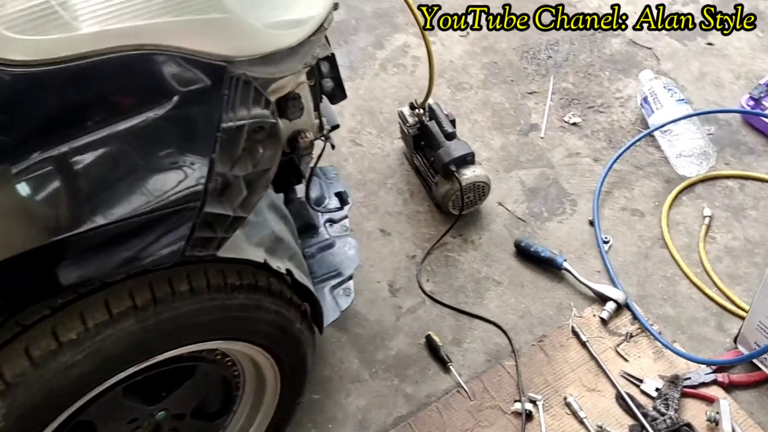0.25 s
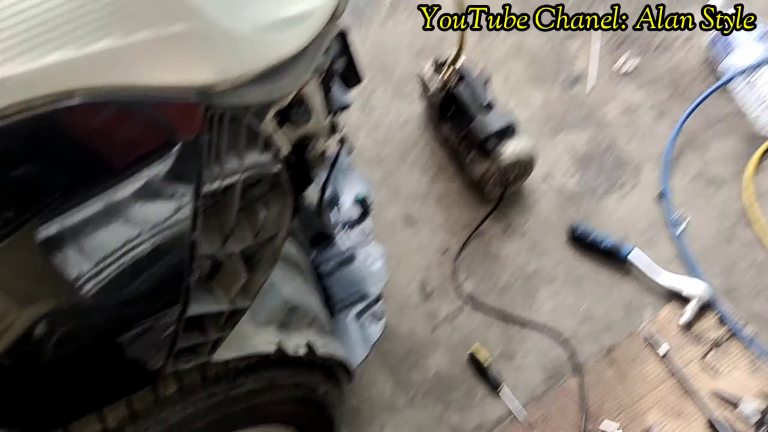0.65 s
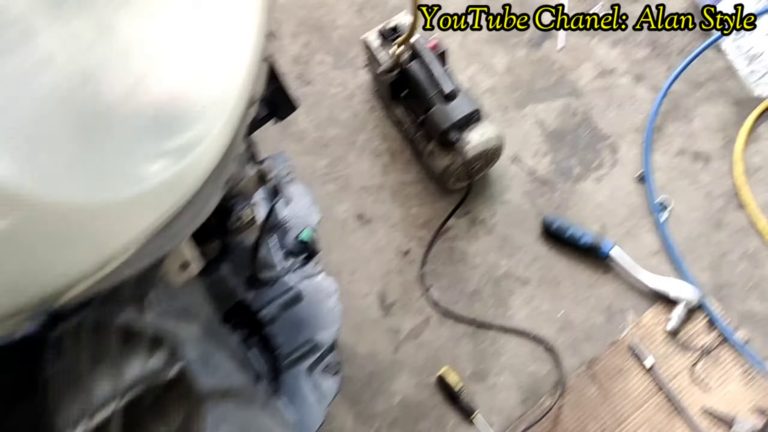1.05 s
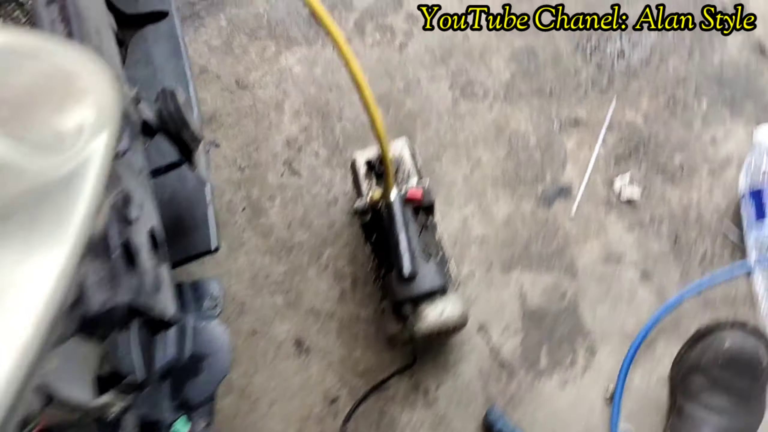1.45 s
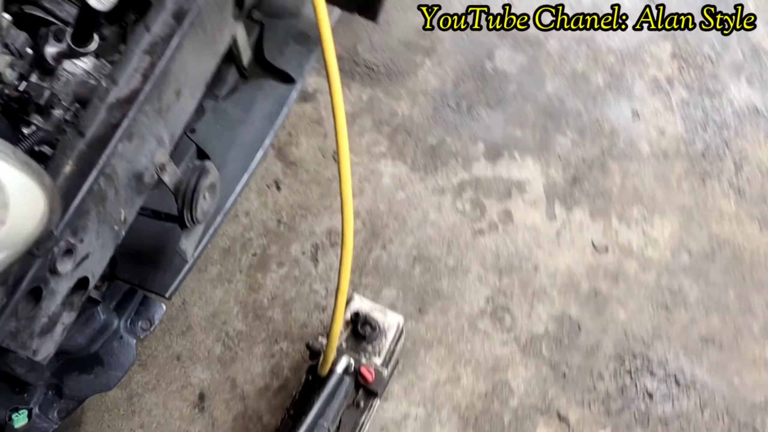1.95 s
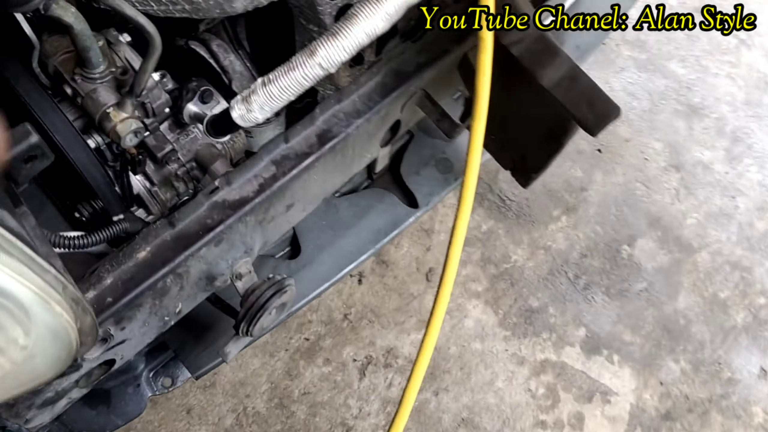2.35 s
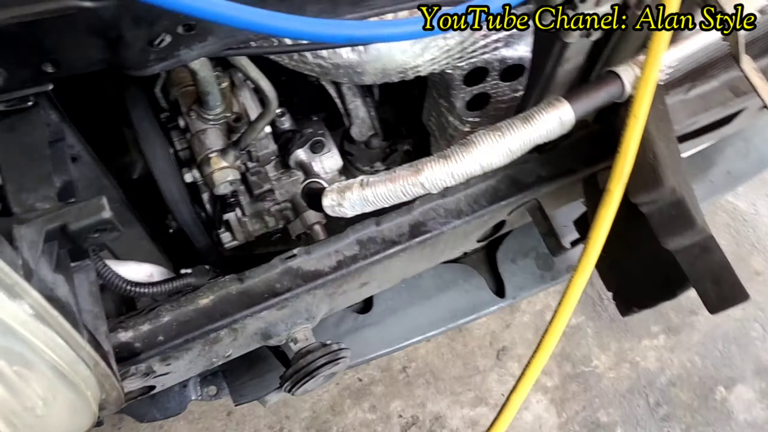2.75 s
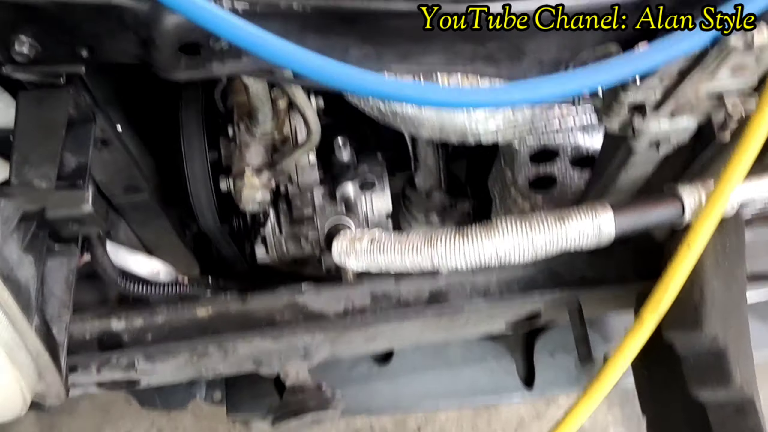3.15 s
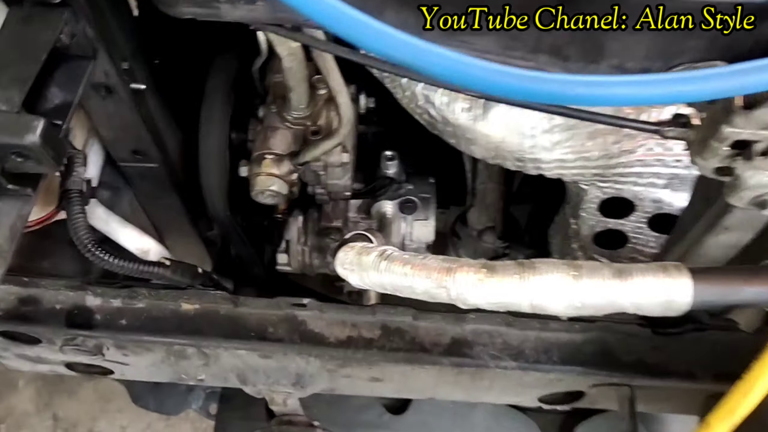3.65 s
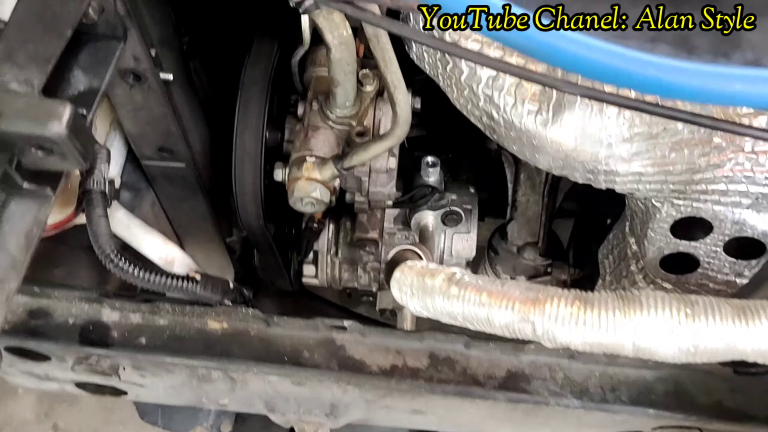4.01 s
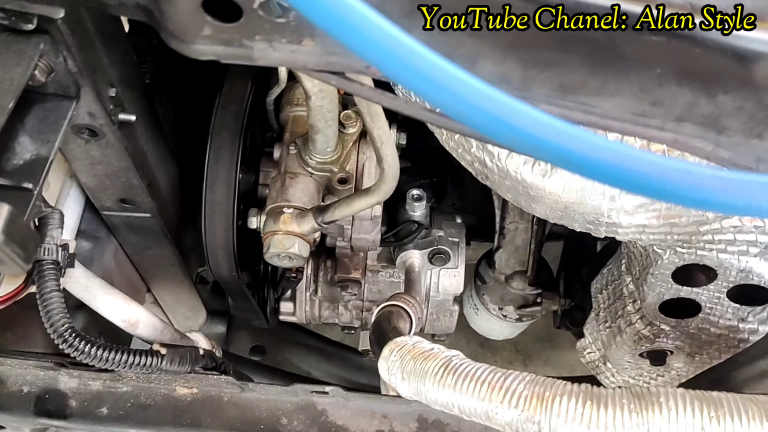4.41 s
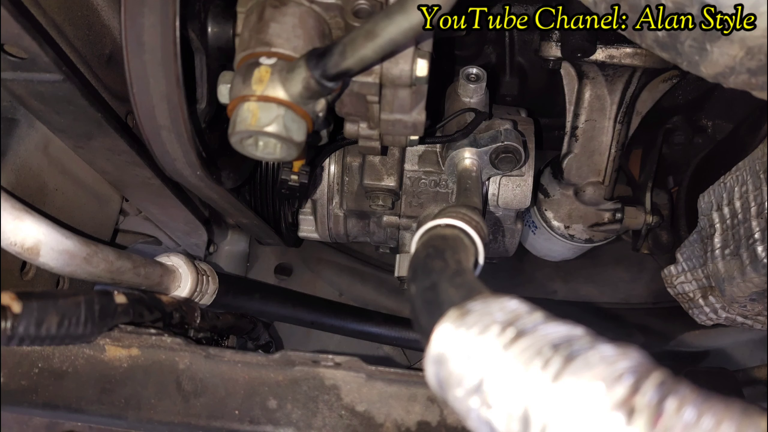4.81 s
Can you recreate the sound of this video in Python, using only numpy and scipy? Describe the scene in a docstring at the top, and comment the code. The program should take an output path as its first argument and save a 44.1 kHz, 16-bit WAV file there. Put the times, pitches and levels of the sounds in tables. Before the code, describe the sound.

Steady fast metallic rattling of a vane pump, with hiss, whirr and low motor hum, interrupted by small microphone bumps and a brief finger rub.

```python
"""An electric rotary-vane vacuum pump runs from the start while a hand-held microphone moves past it.
On every shaft turn two vanes slap and bounce, ringing the metal casing along with air hiss and a whirr;
the motor hums, and a low workshop background holds faint tones at the start and again after 2 s.
Short decaying swings make knocks on the microphone from 0.76 s; near 3.7 s they crowd together and a
rumble of filtered noise is a finger sliding. A short fade ends the sound at 4.84 s, then silence."""
import sys
import numpy as np
from scipy import signal
from scipy.fft import rfft, irfft, next_fast_len
from scipy.io import wavfile
from scipy.ndimage import uniform_filter1d

SR = 44100
rng = np.random.default_rng(int(sys.argv[2]) if len(sys.argv) > 2 else 0)


def to_wav(s):
    """Save 16-bit WAV."""
    ch = np.atleast_2d(s).T  # columns
    pcm = np.round(np.clip(ch, -1, 1) * 32767)  # PCM
    wavfile.write(sys.argv[1], SR, pcm.astype(np.int16))


N = 223799

SHAFT_HZ, FIRST_SLAP_S = 47.155, .0027  # shaft turns per second, time of the first slap


def gain_of(db):
    """Turns decibels into a gain."""
    return 10 ** (np.asarray(db) / 20)


def evened(x):
    """Scales a sound to rms 1."""
    return x / np.sqrt(np.mean(x ** 2) + 1e-20)


def levelled(x, span_s=0.35):
    """Evens out loudness along a sliding span, to about rms 1."""
    size = int(span_s * SR)
    power = uniform_filter1d(uniform_filter1d(x ** 2, size), size)
    return x / np.sqrt(abs(power) + 1e-20)


def curves(rows):
    """Joins the points of a time table with straight lines: one curve for each column after the time."""
    s, *columns = np.transpose(rows)
    return np.array([np.interp(np.arange(N) / SR, s, column) for column in columns])


def colour(x, points):
    """Filters by a spectrum given as points in dB, joined over log frequency."""
    points_hz, points_db = np.transpose(points)
    size = next_fast_len(x.shape[-1])
    hz = np.fft.rfftfreq(size, 1 / SR)
    filter_db = np.interp(np.log(hz + 1), np.log(points_hz + 1), points_db)
    return irfft(rfft(x, size) * gain_of(filter_db), size)[..., :x.shape[-1]]


def sides(balance_db):
    """Left and right gains for a balance in dB; above 0 the left is louder."""
    pair = gain_of([balance_db / 2, -balance_db / 2])
    return pair / pair.mean(0)


def pair_noise(same, size=N):
    """Two channels of white noise: unrelated when same is 0, identical when it is 1."""
    a, b = rng.standard_normal((2, size))
    same = np.clip(same, 0, 1)
    return np.array([a, same * a + np.sqrt(1 - same ** 2) * b])


def wander(span_s):
    """A slow random drift of rms 1, made by smoothing noise twice."""
    size = max(int(span_s * SR), 2)
    return evened(uniform_filter1d(uniform_filter1d(rng.standard_normal(N), size), size))


def vanes(bounce_db=1.0, slip_ms=.06):
    """Clicks where two opposite vanes strike the wall and bounce, each time a little differently."""
    # a slap and its bounces: after_ms, level_db (only their relative size counts)
    bounces = [(0, 1), (1.7, -1), (4.7, -7), (8.3, -10), (11, -16.5)]
    # the opposite vane, half a turn later, settles: start_s, level_db against the first vane
    second_vane = [(0, -2), (.5, -0.5), (.9, -2), (1.3, -6), (2, -13.5), (4.9, -22)]
    # turns given a set slap strength, weak, ordinary or strong: time_s, level_db
    set_slaps = [(0.045, 1.5), (0.066, -2.5), (0.088, -1.5), (0.257, -5.5), (0.3, -5), (0.342, 1),
                 (0.406, -9), (0.427, -11.5), (0.512, -6.5), (0.533, -3), (0.575, 3), (0.724, 4),
                 (0.745, -2.5), (0.787, 4.5), (0.872, 3), (0.915, 2), (0.936, 1.5), (0.957, -6.5),
                 (0.978, -1), (0.999, -6), (1.084, 0.5), (1.105, 0.5), (1.148, 1.5), (1.169, -5.5),
                 (1.19, 3.5), (1.211, 3.5), (1.254, -7), (1.296, -7.5), (1.318, -8.5), (1.424, 3.5),
                 (1.445, 2), (1.466, 2), (1.53, -3), (1.551, 4), (1.593, -2.5), (1.636, -8), (1.657, -5.5),
                 (1.678, 1), (1.699, 3), (1.72, -2), (1.742, 3), (1.805, -1.5), (1.826, -6), (1.848, 2.0),
                 (1.933, -7), (1.954, -2.5), (1.975, -5), (2.017, 1.5), (2.039, 1), (2.06, -1.5),
                 (2.081, 1), (2.102, -9.5), (2.123, 1), (2.251, -5), (2.272, 0.5), (2.293, 2.5),
                 (2.399, -3.5), (2.42, -7), (2.484, -4), (2.505, -10), (2.526, 2), (2.547, -7.5),
                 (2.569, 1), (2.611, 3.5), (2.675, 3), (2.696, -4), (2.717, -5), (2.738, 3), (2.781, 0.5),
                 (2.823, 1.5), (2.844, 1), (2.866, -6.5), (2.887, -6), (2.908, 1.5), (2.929, -7),
                 (2.993, -6.5), (3.014, -7), (3.099, -5.5), (3.12, 1.5), (3.247, -7), (3.311, -2),
                 (3.417, -8.5), (3.459, -5), (3.481, -4), (3.544, -14.5), (3.587, 4), (3.608, 5.5),
                 (3.671, -2.5), (3.714, 2), (3.735, 4.5), (3.905, -3.5), (3.926, 2.5), (3.968, -1),
                 (4.011, -5), (4.117, -6.5), (4.138, -4), (4.159, -0.5), (4.181, 2.5), (4.223, 3),
                 (4.329, 0), (4.371, 3), (4.435, -10.5), (4.477, -2.5), (4.499, 1), (4.52, -2.5),
                 (4.563, -3), (4.584, 2), (4.732, -0.5), (4.753, -5), (4.774, 0.5), (4.795, -1),
                 (4.817, -12)]
    spread_db, port_slip_ms = 1.0, .014  # strength of all other slaps; arrival time at each port

    turns = np.arange(int(N / SR * SHAFT_HZ) - 1)
    strength_db = spread_db * rng.standard_normal(len(turns))
    set_s, set_db = np.transpose(set_slaps)
    set_turns = np.round((set_s - FIRST_SLAP_S) * SHAFT_HZ).astype(int)
    strength_db[set_turns] = set_db

    after_ms, fall_db = np.transpose(bounces)
    second_db = np.interp(turns / SHAFT_HZ, *np.transpose(second_vane))
    clicks, first = np.zeros((2, 2, N))
    for late_turns, vane_db in ((0, 0.012), (.5, second_db)):
        slip, size = rng.standard_normal((2, len(turns), len(bounces)))
        slap_s = FIRST_SLAP_S + (turns[:, None] + late_turns) / SHAFT_HZ
        s = slap_s + (after_ms + slip_ms * slip) / 1000
        slap_gain = gain_of(strength_db + vane_db)
        blow = gain_of(fall_db + bounce_db * size)
        blow *= slap_gain[:, None] / np.linalg.norm(blow, axis=1)[:, None]  # bounces share one blow
        for port in clicks:  # each bounce lands elsewhere on the wall, so its path to each port differs
            port_s = s + port_slip_ms / 1000 * rng.standard_normal(s.shape)
            np.add.at(port, (port_s * SR).astype(int), blow)
        first[:, (s[:, 0] * SR).astype(int)] += slap_gain
    strength_curve_db = np.interp(np.arange(N) / SR * SHAFT_HZ, turns + 0.091, strength_db)
    return evened(clicks), first, strength_curve_db


def casing(broad_db=-3, broad_t60=0.079, unlike=1.144, rise_ms=0.91):
    """Ring of the metal casing: fading sines plus dense noise, with other phases at each microphone port."""
    # clear modes of the casing: pitch_hz, width_hz (wider fades faster), level_db (relative)
    modes_table = [(1228.6, 13, -6), (1410, 12, -5), (1637, 16, -4.5), (1950, 180, -28.5),
                   (2600, 180, -32.5), (3230, 23, -25.5), (2828, 45, -27), (3412, 30, -20), (3603, 16, -8),
                   (3745, 34, -9), (4000, 110, -20), (4519, 36, -11.5), (4815, 48, -11.5), (5730, 17, -17),
                   (5970, 20, -12.5), (5890, 32, -13), (6520, 24, -10), (7064, 30, -2.5), (6790, 170, -8),
                   (7900, 14, -21), (8030, 19, -11), (7930, 41, 2), (8750, 47, -11), (8770, 57, -9),
                   (8576, 37, -0.5), (8530, 190, 0), (8880, 58, 1.5), (10260, 57, -18.5), (9340, 98, -23),
                   (10084, 90, -7.5), (10640, 92, -10.5), (11540, 150, -7.5), (13800, 110, -16)]
    # the many small modes between them: pitch_hz, level_db_per_hz (relative)
    broad = [(900, -76), (1300, -37), (2200, -30.5), (3100, -33), (3700, -20), (4200, -45), (4600, -12.5),
             (6300, -18), (7000, -12), (8500, -14), (9600, -19), (12000, -19), (14000, -26), (16000, -22.5)]
    t = np.arange(8192) / SR
    hz, width, db = np.transpose(modes_table)[:, :, None]
    phase = rng.uniform(0, 2 * np.pi, hz.shape) + unlike * rng.standard_normal((2, *hz.shape))
    fading = gain_of(db) * width * np.exp(-np.pi * width * t)
    modes = (fading * np.sin(2 * np.pi * hz * t + phase)).sum(1)
    modes *= 1 - np.exp(-t * 1000 / rise_ms)
    dense = colour(pair_noise(0.028, size=len(t)) * gain_of(-60 * t / broad_t60), broad)
    return evened(modes) + gain_of(broad_db) * evened(dense)


def reflections(t60=0.23):
    """Floor, car body and walls: one fading noise tail, the same for both ports."""
    t = np.arange(SR // 3) / SR
    tail = pair_noise(1.0, size=len(t)) * gain_of(-60 * t / t60) * (t > .003)
    return tail / np.linalg.norm(tail[0])


def crack(rise_ms=0.61, t60=.03):
    """Short bright burst of noise that each click sets off."""
    # colour of the burst: pitch_hz, level_db_per_hz (relative)
    burst_colour = [(2500, -50), (3200, -38), (3700, -10), (4200, -33), (4600, -11.5), (6000, -10.5),
                    (7000, -4.5), (8600, -1.5), (9600, -8), (12000, -12.5), (16000, -19)]
    t = np.arange(8192) / SR
    burst = pair_noise(0.35, size=len(t)) * gain_of(-60 * t / t60)
    burst = burst * (1 - np.exp(-t * 1000 / rise_ms))
    return evened(colour(burst, burst_colour))


def rung(first, modes, slow_db, turn=1, port_rad=1.39, rise_ms=1.7):
    """Each vane's first blow rings a pair of modes; turn=-1 starts them opposed, and phases differ by port."""
    t = np.arange(SR // 4) / SR
    out = 0
    for k, ((hz, width, db), level_db) in enumerate(zip(modes, slow_db)):
        envelope = np.exp(-np.pi * width * t) * (1 - np.exp(-t * 1000 / rise_ms))
        ring = envelope * np.sin(2 * np.pi * hz * t + [[0], [port_rad]])
        sound = levelled(signal.oaconvolve(first, ring, axes=1)[:, :N])
        out = out + turn ** k * gain_of(db + level_db) * sound
    return out


def by_move(rows):
    """One curve per band: its mean plus its share of each motion of the microphone."""
    # the moving microphone: start_s, nearness_db, lean_to_left_db, top_treble_lift_db
    move = [(0, -2, 5, 0), (.4, -2.5, 3.5, 0.5), (.8, -1, 1, 1), (1.2, -1.5, -1, 3),
            (1.6, -0.76, -0.5, 0.5), (2.0, -0.5, -4, 2), (2.4, -1.1, -1.5, 1), (2.8, -1.53, -3, 0),
            (3.2, 1, -3.5, 1), (3.6, 2.5, 0, 1), (4.0, 2.5, 2.5, 1), (4.4, 2.5, 4.5, -6),
            (4.8, 2.5, 0.5, -2)]
    rows = np.array(rows)
    return rows[:, :1] + rows[:, 1:] @ curves(move)


def pump(hiss_db=-14, follow=0.79, wet_db=-12, spot_s=0.3021, count=8):
    """Clicks, air hiss and whirr ring the casing; the microphone's motion shifts each band separately."""
    # bearings and oil whirr whatever the vanes do: pitch_hz, level_db against the slaps
    whirr = [(900, -7), (2000, -5), (3000, 0), (3700, -5), (5000, -10), (6800, -9), (7600, -20),
             (9500, -16), (12000, -9), (16000, -7)]
    # crack at each blow, plainer when the microphone faces the pump: start_s, level_db before band levelling
    crack_db = [(0, -7.5), (1.2, -16.5), (2, -5.5), (3, -10), (3.8, -11.5), (4.2, 0.5), (4.8, -3)]
    # dips where casing modes cancel, and one small lift: pitch_hz, width_hz, level_db
    hollows = [(2200, 140, -1), (3540, 380, -9.5), (4182, 128, -14.5), (5360, 70, -7), (6730, 240, 2),
               (7400, 120, -5.5)]
    # where one frequency band meets the next: pitch_hz
    band_edges = [1000, 2200, 3150, 4250, 7300, 8150, 9700, 22000]
    # level of each band: mean_db, then db per db of nearness, lean and lift
    band_levels = [(-57.5, 2.33, 0.47, 0.44), (-63.5, 1.47, -0.51, -0.14), (-51, 0.23, 0.32, 0.28),
                   (-46.5, 1.86, -0.11, -0.66), (-47.5, 2.5, -0.61, -0.53), (-42, 0.61, -1.02, -0.04),
                   (-45.5, 1.98, -0.13, 1)]
    # left-right balance of each band: mean_db, then db per db of nearness, lean and lift
    band_balances = [(2.5, -0.5, 0.37, 0.26), (1.1, -0.2, 1, 0.52), (2.5, -0.46, 0.18, 0.15),
                     (3.5, 0.54, 0.46, 0.29), (0.5, -1, 1.1, 0.18), (-5, 1.25, 0.77, .05),
                     (2.5, 0.85, 0.51, 1)]
    # two low ringing tones of the casing, struck by each first blow:
    # pitch_hz, width_hz, level_db against their band
    low_tones = [(1236, 6.8, 0), (1637, 11, -3.5)]
    # added level of these two tones as the microphone moves: start_s, lower_db, upper_db
    low_tones_db = [(0, -5, -1), (.6, 2, 2.5), (1.1, -7.5, 1), (1.45, -9, -1), (1.7, 1.5, -1),
                    (1.9, -2.5, 1), (2.3, -3.5, 2.5), (2.42, 0.5, 2), (2.65, 4.5, -4), (2.88, 2, -6),
                    (3.0, -12, -18), (3.3, -0.5, 1), (3.7, -0.5, 2), (4.2, -1.5, 2), (4.8, -4, 2.5)]
    # close bright modes that start opposed and swell just after a slap:
    # pitch_hz, width_hz, level_db against their band
    bright_pair = [(3596, 27, -5.5), (3739, 40, -8.5)]

    clicks, first, strength_db = vanes()
    direct = clicks * gain_of(curves(crack_db))
    hiss = gain_of(hiss_db + follow * strength_db) * pair_noise(0.29)  # stronger slaps, louder hiss
    drive = clicks + hiss + colour(pair_noise(0.92), whirr)

    size, place = next_fast_len(N + SR), np.arange(N) / SR / spot_s
    spectrum = 0
    for k in range(count):  # smooth crossfades between listening spots, which come round in a cycle
        away = (place - k + count / 2) % count - count / 2
        share = np.cos(np.pi / 2 * np.clip(away, -1, 1))
        path = rfft(casing(), size) * (1 + gain_of(wet_db) * rfft(reflections(), size))
        spectrum = spectrum + rfft(drive * share, size) * path
        spectrum = spectrum + rfft(direct * share, size) * rfft(crack(), size)

    hz = np.fft.rfftfreq(size, 1 / SR)
    spectrum *= gain_of(sum(db * np.exp(-((hz - f) / width) ** 2) for f, width, db in hollows))
    above = [1 / (1 + (edge / (hz + 1)) ** 40) for edge in band_edges]  # steep filter edges
    bands = []
    for low, high in zip(above, above[1:]):
        bands.append(levelled(irfft(spectrum * (low - high), size)[:, :N]))
    bands[0] = bands[0] + rung(first, low_tones, curves(low_tones_db))
    bands[2] = bands[2] + rung(first, bright_pair, [0, 0], turn=-1)

    levels, balances = by_move(band_levels), by_move(band_balances)
    return sum(band * gain_of(level_db) * sides(balance_db)
               for band, level_db, balance_db in zip(bands, levels, balances))


def motor(waver_db=1.0, waver_rad=0.058):
    """Motor hum: sines at whole multiples of the shaft speed, wavering a little in level and phase."""
    # overall hum: start_s, level_db, left_right_db
    hum = [(0, -57, -6), (.7, -54.5, -7), (1.2, -54, 1.5), (1.8, -57, 3), (2.3, -59, -0.5),
           (2.8, -62.5, -2.5), (3.5, -58.5, 0.5), (3.8, -56.5, 0.5), (3.97, -54.5, -3), (4.83, -56, 1.5)]
    # each sine: shaft_order (multiple of the shaft speed), level_db against the overall hum
    orders = [(2, -23.5), (3, -23), (4, 1), (5, -12), (6, -21), (7, -33.5)]
    level_db, balance_db = curves(hum)
    turn, out = 2 * np.pi * SHAFT_HZ * np.arange(N) / SR, np.zeros(N)
    for k, db in orders:
        start = rng.uniform(0, 2 * np.pi)
        level = gain_of(db + waver_db * wander(0.04))
        out += level * np.sin(round(k) * turn + waver_rad * wander(0.17) + start)
    return np.sqrt(2) * out * gain_of(level_db) * sides(balance_db)


def workshop():
    """Low background of coloured noise, with faint wavering tones that come and go."""
    # faint tones in the workshop: pitch_hz, full_from_s, full_to_s, level_db
    far_tones = [(490, 0, .7, -72), (908, 2.0, 2.6, -72.5), (806, 2.0, 3.0, -78)]
    # background level: start_s, level_db
    room_db = [(0, -59), (1.4, -61), (1.8, -59), (2.8, -58.5), (3.1, -57), (3.5, -58), (4.2, -59.5),
               (4.83, -55)]
    # background colour: pitch_hz, level_db_per_hz (relative)
    room = [(15, -67), (25, -24.5), (129, -13.5), (189, -1.5), (331, -14), (1070, -18.5), (1250, -9.5),
            (1670, -16.5), (1910, -18), (2500, -22), (3250, -43.5), (5500, -120)]
    t = np.arange(N) / SR
    tones = np.zeros(N)
    for hz, full_from, full_to, db in far_tones:
        level = gain_of(db + wander(0.076))
        fade = np.clip(np.minimum(t - full_from, full_to - t) / 0.65 + 1, 0, 1)  # 0.65 s in and out
        tones += level * fade * np.sin(2 * np.pi * hz * t + .5 * wander(0.08))
    noise = evened(colour(pair_noise(0.67), room))
    return gain_of(curves(room_db)) * noise * sides(0.6)[:, None] + tones


def handling():
    """Knocks are short swings of the membrane; a finger's slide is a low rumble of noise."""
    # knocks on the microphone body: start_s (of the peak), level_db before the body's filter, pitch_hz,
    # length_ms, left_right_db, push (about 1) or pull (-1)
    knocks = [(0.756, -41.5, 890, 2.5, 4, 0.92), (1.539, -44, 353, 3.9, 3, 1),
              (1.550, -43.5, 342, 6.2, -2, 1), (3.005, -45, 424, 1.4, 13, 1),
              (3.1072, -30.5, 634, 1.6, 21, 0.94), (3.6808, -28.5, 250, 2, 1, -1),
              (3.6867, -27.5, 250, 1, 5, 0.88), (3.6907, -31, 250, 1.4, 2.5, 0.88),
              (3.7028, -30, 200, 4.5, -0.5, -1), (3.7101, -30.5, 190, 5, 0, 1),
              (3.7370, -31.5, 170, 5.4, 4.5, 1), (3.766, -22, 150, .8, 35.5, 1)]
    # a finger slides on the body: start_s, level_db
    rub = [(3.65, -53), (3.69, -49), (3.745, -49), (3.785, -56)]
    # colour of the slide: pitch_hz, level_db_per_hz (relative)
    rub_colour = [(18, -48), (30, -18.5), (85, -8.5), (210, -9), (296, -10.5), (584, -17), (1100, -22),
                  (1430, -66), (2420, -120)]
    out, u = np.zeros((2, N)), np.arange(-300, 300) / SR
    for s, db, hz, ms, balance_db, push in knocks:
        length = ms * np.where(u < 0, .3, 1)  # the rise is quicker than the fall
        swing = push * np.exp(-(u * 1000 / length) ** 2) * np.cos(2 * np.pi * hz * u)
        start = round(s * SR) - 300
        out[:, start:][:, :len(u)] += gain_of(db) * sides(balance_db)[:, None] * swing
    out = colour(out, [(30, -36), (90, 2.5), (150, -4.0), (2000, -3.5)])  # the body passes no slow push
    t = np.arange(N) / SR
    during = (t > rub[0][0]) & (t < rub[-1][0])
    slide = evened(colour(pair_noise(0.72), rub_colour)) * gain_of(curves(rub))
    return out + slide * uniform_filter1d(during * 1., 400)


def scene():
    """Adds up pump, motor, workshop and hands."""
    return pump() + motor() + workshop() + handling()


def record(dry):
    """Stops the sound with a short fade, then cuts the highest treble."""
    end_s, fade_s, edge_hz = 4.838, 0.00376, 15800
    fade = np.clip((end_s - np.arange(N) / SR) / fade_s, 0, 1)
    low_pass = signal.firwin(255, edge_hz, window=("kaiser", 9), fs=SR)
    return signal.oaconvolve(dry * fade, low_pass[None], "same")


dry = scene()
out = record(dry)
to_wav(out)
```